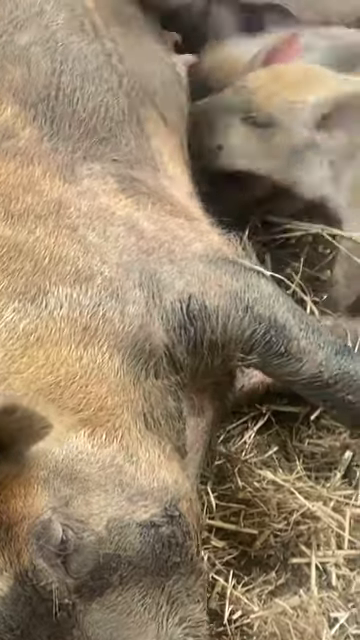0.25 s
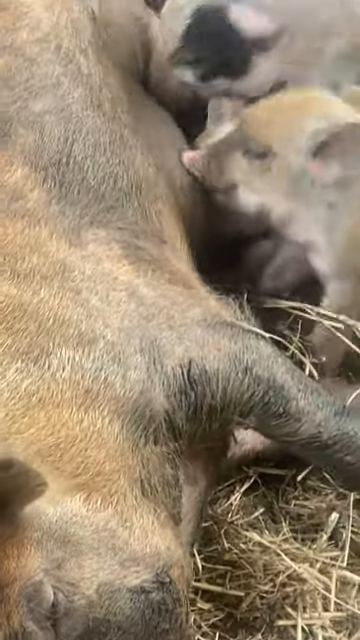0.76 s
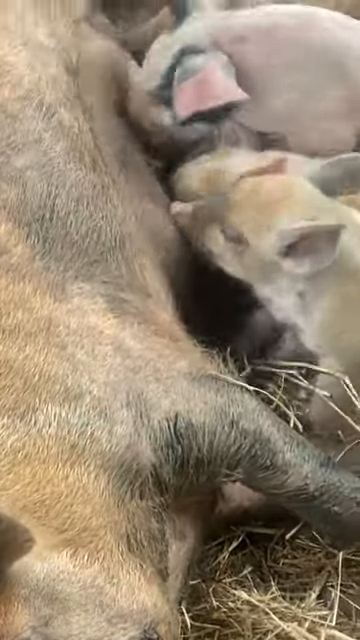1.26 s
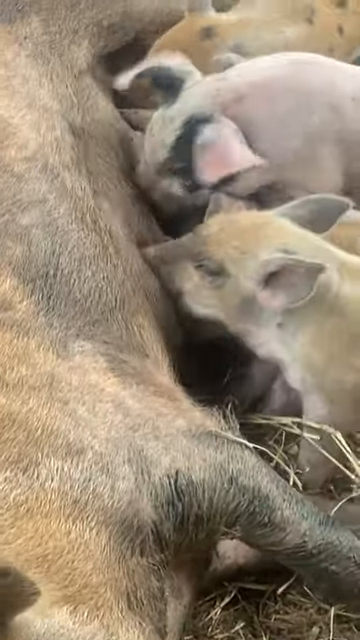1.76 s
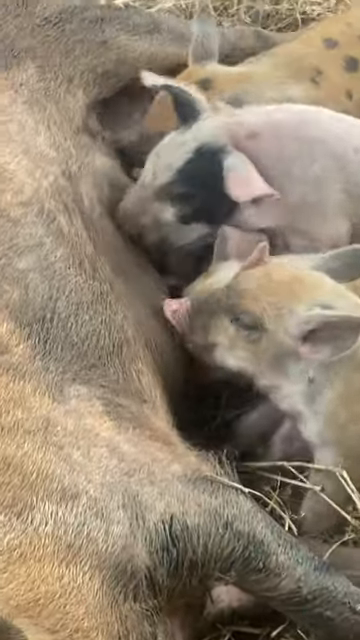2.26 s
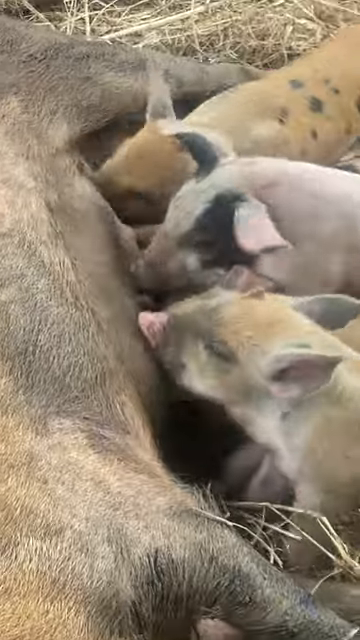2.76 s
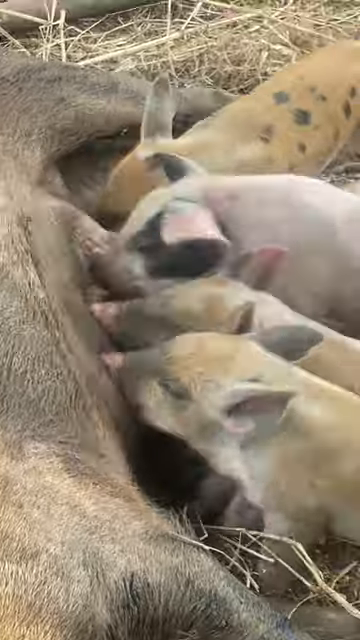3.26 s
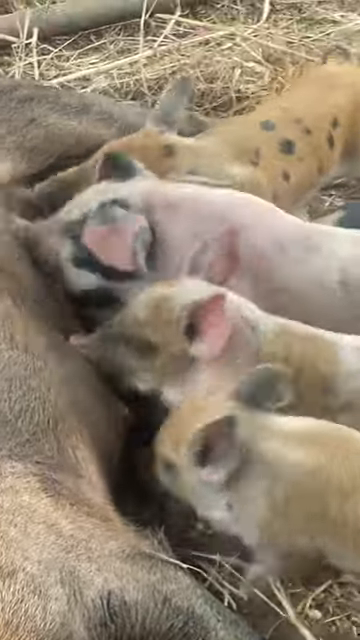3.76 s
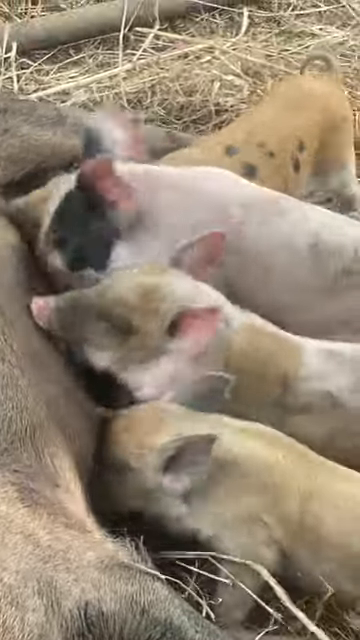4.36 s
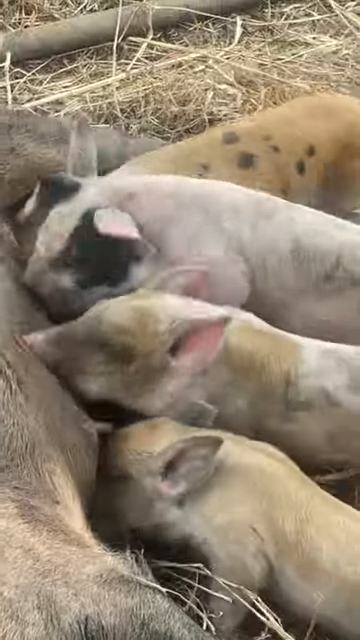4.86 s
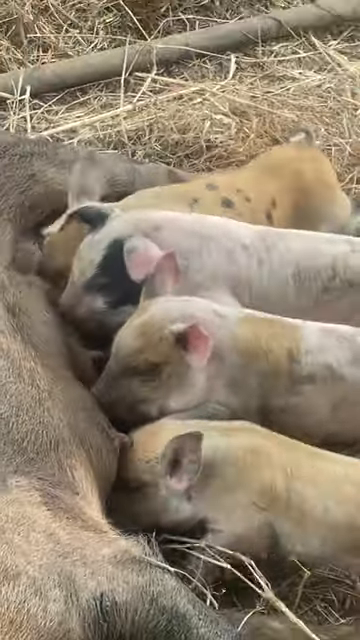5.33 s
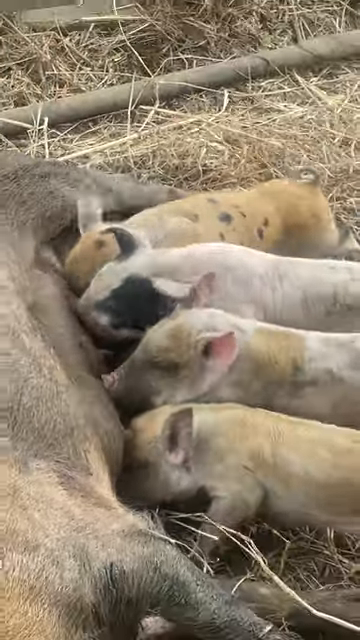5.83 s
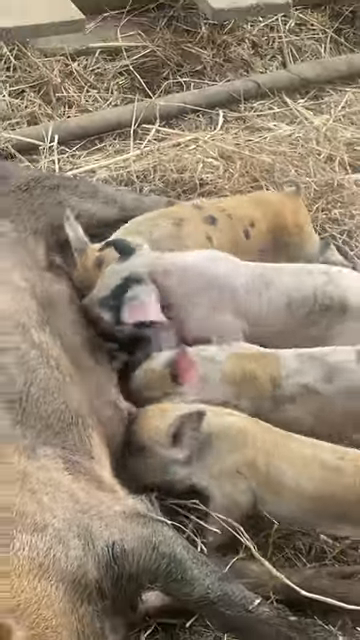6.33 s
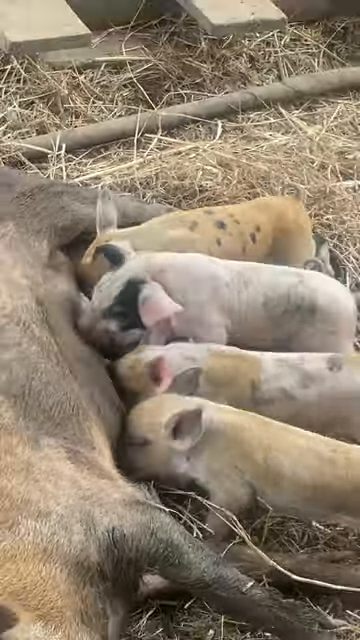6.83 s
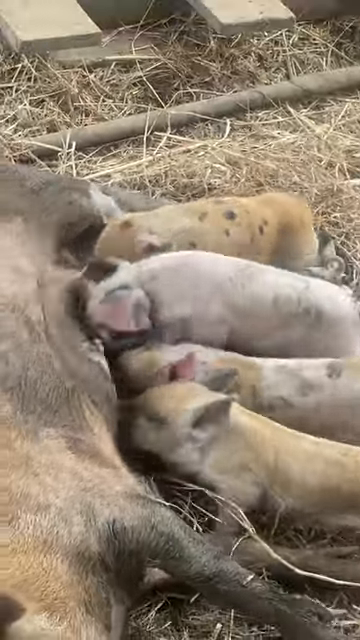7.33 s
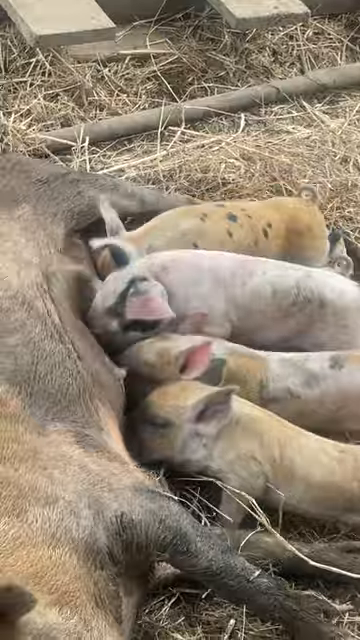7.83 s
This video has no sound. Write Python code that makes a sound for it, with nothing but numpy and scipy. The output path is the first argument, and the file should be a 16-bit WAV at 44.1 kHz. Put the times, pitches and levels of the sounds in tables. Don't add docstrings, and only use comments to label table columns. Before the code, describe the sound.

A sow gives short, low, rattling grunts about twice a second, close up, while piglets smack softly and straw rustles over faint insect hiss.

```python
import sys
import numpy as np
from scipy import signal
from scipy.fft import rfft, irfft, next_fast_len
from scipy.io import wavfile
from scipy.ndimage import uniform_filter1d

SR = 44100
rng = np.random.default_rng(int(sys.argv[2]) if len(sys.argv) > 2 else 0)


def persist_wave(psi):
    counts = np.round(np.clip(psi, -1, 1) * 32767).astype(np.int16)
    wavfile.write(sys.argv[1], SR, np.atleast_2d(counts).T)


def natural_amplitude(level_db):
    exponent = np.asarray(level_db, float) / 20
    return 10 ** exponent


N = 356769
T, M = np.arange(N) / SR, next_fast_len(N)
F = np.arange(M // 2 + 1) * SR / M + 1e-3

# folds_part_s, first_clap_s, end_s, first_period_ms, period_change_per_clap_ms
GRUNTS = [(.069, 0.089, 0.274, 27.57, -1.83), (.579, 0.6063, 0.757, 26.83, -0.2),
          (.981, 1.0102, 1.17, 27.22, -1.54), (1.16, 1.1891, 1.35, 29.11, 0.69),
          (1.372, 1.3782, 1.591, 28.53, -0.49), (1.737, 1.7678, 1.95, 30.23, -2.49),
          (2.219, 2.2435, 2.432, 28.4, -1.34), (2.729, 2.7475, 2.932, 27.92, -1.92),
          (3.229, 3.2546, 3.435, 27.79, -1.63), (3.635, 3.6835, 3.81, 27.3, -1.66),
          (4.137, 4.1641, 4.32, 27.83, -0.77), (4.26, 4.2693, 4.535, 29.18, -0.04),
          (4.527, 4.5566, 4.73, 28.28, 0.47), (4.749, 4.7749, 4.965, 30.1, -1.44),
          (5.077, 5.1227, 5.278, 26.85, -0.91), (5.442, 5.4804, 5.658, 27.44, -0.66),
          (5.877, 5.9248, 6.083, 27.64, -1.07), (6.315, 6.3357, 6.518, 27.59, -0.59),
          (6.613, 6.6556, 6.79, 26.62, -1.18), (6.968, 6.9928, 7.181, 27.13, -1.36),
          (7.416, 7.4579, 7.64, 25.06, -0.08), (7.825, 7.8504, 8.03, 26.87, -0.4)]
# chest_db, strongest_clap_db, its_place_claps, fall_db_per_clap_squared, snout_db
EFFORTS = [(-29, -19, 1.71, 1.9, -28), (-31, -20, 1.13, 5.5, -28.5), (-30.5, -22, 0.87, 4, -34),
           (-32.5, -25, 1.38, 8.5, -33.5), (-33, -18.5, 2.48, 1.3, -28.5), (-33, -20, 1.63, 4.5, -30),
           (-30, -19, 1.72, 3, -29), (-30.5, -17.5, 1.48, 3.5, -28), (-32, -20.5, 1.02, 3, -31.5),
           (-31.5, -21.5, 0.49, 3.5, -47), (-31.5, -23.5, 1.13, 2, -34), (-34, -40, 0.1, 0, -49),
           (-36, -28.5, 0.091, 1.5, -36), (-32.5, -20.5, 1.6, 1.5, -28.5), (-30, -18, 1.3, 3.5, -27.5),
           (-31.5, -20, 1.95, 2.5, -30.5), (-31.5, -18.5, 0.76, 4, -29), (-31.5, -17.5, 1.62, 2.5, -28),
           (-30, -19.5, 0.29, 3.5, -30.5), (-30.5, -18, 1.53, 3.5, -27.5), (-30.5, -17, 1.25, 1.5, -27.5),
           (-30, -16.5, 1.61, 3.7, -26.5)]
SNOUT_FALL = [2.3, 12, 5.6, 8.6, 1.65, 4.5, 10, 3.6, 6, 3.8, 5.2, .4, 6.2, 1.5, 1.8, 1.7, 1.9, 1.55, 3.4,
              4.3, 1.5, 5.8]
# start_s, length_s, level_db
MURMURS = [(4.528, .01, -30.5), (3.453, .02, -42), (5.04, 0.016, -44), (6.163, 0.102, -44.5),
           (6.576, 0.013, -42)]
# pitch_hz, ring_t60_s, level_db
BELLY_MODES = [(75.1, 0.17, 0)]
CHEST_MODES = [(145.8, 0.13, 2), (174, 0.093, 0.5), (217, 0.07, -3), (308.7, 0.12, -6.5)]
THROAT_MODES = [(442.1, 0.14, -8), (474.7, 0.086, -6), (568.5, 0.03, 2), (632.7, 0.051, -7.5),
                (703, 0.054, -10), (849, 0.067, -4.5), (786, 0.0099, 0), (906.5, 0.072, -9.5),
                (1320, 0.013, -2.5), (1051, 0.013, -16.5)]
SNOUT_MODES = [(1368, 0.02, -20.5), (1500, 0.088, -7), (1692, 0.026, -6), (2160, 0.02, -6),
               (2405, 0.021, -2), (2900, 0.034, -6), (3074, 0.085, -11.5), (3490, 0.01, -7.5),
               (3740, 0.023, -2), (4040, 0.008, 7), (4308, 0.023, 3), (4650, 0.016, -5.5),
               (5180, 0.0059, -3.5), (8330, 0.035, -17), (9950, 0.039, -17.5)]
# start_s, level_db, centre_hz,
# decay_t60_s
SMACKS = [(.228, -55, 9000, .03), (0.517, -56, 2190, 0.16), (.875, -61, 2500, 0.018),
          (1.14, -47, 4500, 0.011), (1.991, -54, 9300, 0.066), (2.136, -53, 3600, 0.034),
          (2.148, -52, 2930, 0.036), (2.906, -38.5, 3280, 0.028), (3.227, -46, 2810, 0.047),
          (3.404, -48, 2600, 0.23), (3.734, -41.5, 4330, 0.031), (3.605, -55, 2620, 0.12),
          (4.08, -54, 2900, 0.15), (5.848, -53.5, 2230, 0.21), (6.041, -42, 3580, 0.026),
          (6.048, -41, 3670, 0.085), (6.581, -48, 9800, 0.022), (6.582, -55, 2740, 0.036),
          (6.835, -44.5, 2400, 0.12), (7.008, -54, 9500, .04), (7.267, -57.5, 2550, 1),
          (7.642, -44, 5200, 0.012), (7.81, -54, 2480, 0.18), (8.005, -57, 2600, 0.023)]
# start_s, level_db, centre_hz, decay_t60_s
SWELLS = [(0.199, -56.5, 2700, .6), (.84, -62, 1020, 0.2), (2.08, -57.5, 340, 0.17),
          (3.459, -51, 347, 0.14), (5.055, -52.5, 3720, 0.17), (7.24, -53.5, 373, 0.39),
          (7.7, -53.5, 336, 0.14), (5.05, -50.5, 9500, 0.23), (1.734, -46, 870, 0.18),
          (2.53, -59.5, 2860, 0.22), (2.917, -52, 3600, 0.079), (3.02, -55, 493, 0.24),
          (3.039, -58, 1230, 0.36), (3.37, -55, 2090, 0.16), (3.80, -52, 9700, 0.092),
          (4.275, -37, 338, 0.4), (4.23, -43, 680, 0.85), (4.305, -47, 1810, 0.27),
          (4.401, -54, 3840, 0.11), (5.062, -61, 2700, .2), (6.165, -53.5, 1370, 0.38),
          (6.201, -54.5, 2420, 0.27), (6.751, -53, 7950, 0.1), (6.88, -58, 2900, 0.24),
          (7.40, -40.5, 860, 0.33), (7.815, -59, 870, 0.094)]
# start_s, length_s, first_pitch_hz, last_pitch_hz, level_db
SQUEAKS = [
    (1.595, .02, 3120, 3260, -65),
    (1.61, .022, 2820, 3100, -69),
    (1.63, .022, 3300, 3330, -64),
    (1.883, .045, 3950, 3300, -60),
    (1.925, .027, 2850, 2220, -70),
    (2.115, .02, 2720, 2660, -66),
    (2.985, .025, 2150, 2060, -67),
    (3.19, .03, 2130, 2300, -67),
]
# start_s, length_s, first_pitch_hz, last_pitch_hz, level_db
WHINE = [
    (5.3, .15, 2330, 2280, -72),
    (5.65, .19, 2240, 2180, -72),
]
# time_s, stir_db
STIR = [(0.0, -62), (0.95, -63), (1.15, -51), (1.3, -66), (1.36, -55.5), (1.55, -68), (2.6, -72),
        (2.97, -62.5), (3.58, -58.5), (3.87, -67.5), (4.2, -58.5), (4.45, -62.5), (5.0, -65.5),
        (5.08, -59.5), (5.9, -69.5), (6.06, -62), (7.46, -60), (8.09, -65)]
# centre_hz, width_hz
STRAW_BANDS = [(450, 590), (2500, 6760), (9800, 4100)]
STRAW_GRAINS_HZ = [900, 3000, 5000]
PIGLET_STIR_DB = [-3, -0.5, -3.7]
FLANK_STIR_DB = [-26, -33, -64.5]
# frequency_hz, density_db_per_hz
FIELD = [(40, -6), (150, 2.5), (500, -20.5), (1100, -19), (1900, -27.5), (3000, -25.5), (4000, -20),
         (4900, -3.5), (5800, -10), (6500, -2.5), (7400, -13.5), (10000, -19), (12000, -33), (15500, -36)]
# frequency_hz, left_lead_rad
PORT_PHASE = [(0, 0), (430, -0.2), (950, 0.3), (1210, -0.0), (1890, 0.1), (2580, 1.2), (3360, 0.4),
              (3960, 0.4), (4650, 1.6), (5250, 6.2), (5770, 6.8), (7490, 7.7), (10900, 8.6), (11800, 9.4)]
# frequency_hz, left_minus_right_db
PORT_DB = [(100, 0), (300, .8), (520, -2), (800, 4.5), (1000, 5.5), (1300, 2.5), (1800, 0), (16000, 0)]
# frequency_hz, share_0_to_1
PORT_APART = [(200, 0.044), (350, 0.24), (800, 0.51), (2000, 0), (5000, 0.24), (7500, 0.25), (11000, 0.23),
              (12000, 0.042)]


def sow():
    s, throat_db, snout_db = claps()
    chest = body(s, CHEST_MODES, 0, sooner_s=0.014)
    belly = natural_amplitude(-4) * body(s, BELLY_MODES, lag_s=0.012, sooner_s=0)
    fade = np.exp(-np.log(1000) / (.1 * SR))
    puff = signal.lfilter([1], [1, -fade], clicks(s, throat_db)) * rng.standard_normal(N) * natural_amplitude(-31)
    rasp = signal.lfilter([1], [1, -fade], clicks(s, snout_db)) * rng.standard_normal(N) * natural_amplitude(-40)
    flutter = natural_amplitude(effort(0) - 37 + 2.2 * walk(90)) * rng.standard_normal(N)
    throat_drive = uneven(s + .0004, throat_db, THROAT_MODES) + natural_amplitude(3.0) * puff + flutter
    throat = push(ring(throat_drive, THROAT_MODES, 1), .8)
    snout_drive = uneven(s, snout_db, SNOUT_MODES) + rasp + natural_amplitude(-13) * puff
    snout = ring(snout_drive, SNOUT_MODES)
    voice = chest + belly + natural_amplitude(-7.5) * throat + natural_amplitude(-4.5) * snout
    return voice - 0.85 * band(voice, 356.3, 90)


def claps():
    lead_gap_s, lead_db, lead_step_db, lead_snout_db = .0205, -18, 7.5, -21
    snout_earlier_claps, shortest_period_ms = 0.47, 22
    rows, k = [], np.arange(12)
    for s, length, db in MURMURS:
        rows += [(at, db, db + lead_snout_db) for at in np.arange(s, s + length, lead_gap_s)]
    for grunt, strength, snout_fall in zip(GRUNTS, EFFORTS, SNOUT_FALL):
        part, start, end, ms, drift = grunt
        _, db, at, fall, snout_db = strength
        opening = part + lead_gap_s * k
        soft = db + lead_db + lead_step_db * k
        rows += list(np.c_[opening, soft, soft + lead_snout_db][opening < start - .008])
        periods = np.maximum(ms + drift * k, shortest_period_ms)
        s = start + np.r_[0, np.cumsum(periods)[:-1]] / 1000
        throat = db - fall * (k - at) ** 2
        snout = snout_db - snout_fall * (k - at + snout_earlier_claps) ** 2
        rows += list(np.c_[s, throat, snout][s < end])
    return np.transpose(rows)


def effort(lag_s, sooner_s=0):
    early_s, attack_s, release_s = 0.0024, 0.022, .07
    start_db, tilt_db, end_db, rest_db = -11, 0.9, -17.5, -56.5
    calls = [(part, clap, end, row[0]) for (part, clap, end, *_), row in zip(GRUNTS, EFFORTS)]
    calls += [(s, s, s + length + 0.023, db + 3.5) for s, length, db in MURMURS]
    out = np.full(N, rest_db)
    for part, clap, end, db in calls:
        full = clap + attack_s
        stop = end - sooner_s
        times = [part - early_s, full, max(stop - release_s, full), max(stop, full + 0.013)]
        shape = db + np.array([start_db, -tilt_db, tilt_db, end_db])
        out = np.maximum(out, np.interp(T - lag_s, times, shape, -99, -99))
    return out


def body(s, modes, lag_s, sooner_s):
    tone = ring(push(clicks(s, 0 * s), 2.97), modes)
    tone = tone / np.sqrt(uniform_filter1d(tone ** 2, size=1800) + 0.27)
    rough = natural_amplitude(-13) * unit(ring(rng.standard_normal(N), modes))
    return natural_amplitude(effort(lag_s, sooner_s)) * (tone + rough)


def uneven(s, db, modes):
    scatter_db = 1.3
    chance = rng.standard_normal((len(s), len(modes))).T
    return np.array([clicks(s, db + scatter_db * c) for c in chance])


def smacks():
    size = 8000
    out, t = np.zeros(N), T[:size]
    rows = [row + (0.003,) for row in SMACKS]
    rows += [row + (0.087 * row[-1],) for row in SWELLS]
    for (s, db, hz, t60, rise), noise in zip(rows, rng.standard_normal((len(rows), size))):
        edges = [hz / 1.38, min(hz * 1.234, .45 * SR)]
        sos = signal.butter(3, edges, "band", fs=SR, output="sos")
        shape = np.minimum(t / rise, 1) * 1000 ** (-np.maximum(t - rise, 0) / t60)
        burst = natural_amplitude(db) * unit(signal.sosfilt(sos, noise)) * shape
        i = int(s * SR)
        out[i:i + size] += burst[:N - i]
    return out


def squeaks():
    tremble = walk(250)
    short_calls = sum(glide(row, 0.043 * tremble, 0.12) * natural_amplitude(1.97 * walk(120) + 2.0) for row in SQUEAKS)
    far = sum(glide(row, 0.047 * tremble, 0.084) for row in WHINE)
    return short_calls + far


def glide(row, wobble, edge_share):
    s, length, first_hz, last_hz, db = row
    part = np.clip((T - s) / length, 0, 1)
    gate = np.minimum(np.minimum(part, 1 - part) / edge_share, 1)
    hz = (first_hz + part * (last_hz - first_hz)) * (1 + wobble)
    return np.sqrt(2) * gate * natural_amplitude(db) * np.sin(2 * np.pi * np.cumsum(hz) / SR)


def straw():
    scatter_db, top_db = 1.8, -56
    out, stir, heave = 0, table(STIR, T)[0], effort(0)
    ranges = zip(PIGLET_STIR_DB, FLANK_STIR_DB, STRAW_BANDS, STRAW_GRAINS_HZ)
    for stir_db, heave_db, (hz, width), rate in ranges:
        sizes = rng.standard_normal(N) * natural_amplitude(scatter_db * rng.exponential(size=N))
        grains = (rng.random(N) < rate / SR) * sizes
        gain = np.minimum(natural_amplitude(stir + stir_db) + natural_amplitude(heave + heave_db), natural_amplitude(top_db))
        out = out + gain * natural_amplitude(2.9 * walk(7.6)) * unit(band(grains, hz, width))
    return out


def field():
    colour = rfft(rng.standard_normal(M)) * natural_amplitude(spectrum(FIELD))
    out = 0
    for hz in 40 * 2 ** np.arange(0, 9, .5):
        flicker = natural_amplitude((1.5 + hz / 5000) * walk(7))
        out = out + flicker * irfft(colour * np.exp(-(np.log2(F / hz) * 0.97) ** 2), M)[:N]
    return natural_amplitude(-54.5) * unit(out)


def ports(x, apart):
    half = natural_amplitude(spectrum(PORT_DB) / 2) * np.exp(.5j * table(PORT_PHASE, F)[0])
    smear = np.exp(2j * np.pi * rng.random(len(F) // 40 + 1)).repeat(40)[:len(F)]
    side = apart * np.clip(spectrum(PORT_APART), 0, 1) * smear
    return irfft(rfft(x, M) * np.array([(1 + side) * half, (1 - side) / half]), M)[:, :N]


def table(rows, at):
    x, *cols = np.transpose(rows)
    return [np.interp(at, x, c) for c in cols]


def spectrum(rows):
    return table([(np.log(hz), v) for hz, v in rows], np.log(F))[0]


def unit(x):
    return x / np.sqrt(np.mean(x ** 2))


def clicks(times, db):
    return np.bincount(np.clip((times * SR).astype(int), 0, N - 1), natural_amplitude(db), N)


def ring(x, modes, flip=-1):
    out = 0
    for k, (hz, t60, db) in enumerate(modes):
        r, w = 1000 ** (-1 / (t60 * SR)), 2 * np.pi * hz / SR
        gain = flip ** k * natural_amplitude(db) * r * np.sin(w)
        drive = x[k] if x.ndim > 1 else x
        out = out + signal.lfilter([0, gain], [1, -2 * r * np.cos(w), r * r], drive)
    return out


def push(x, ms):
    bump = np.hanning(int(ms * SR / 1000) + 3)
    return np.convolve(x, bump / bump.sum())[:N]


def band(x, hz, width):
    return irfft(rfft(x, M) * np.exp(-(np.log(F / hz) * hz / width * 2) ** 2), M)[:N]


def walk(rate):
    k = int(SR / rate)
    held = np.repeat(rng.standard_normal(N // k + 1), k)
    return uniform_filter1d(uniform_filter1d(held, k), k)[:N]


def scene():
    near = ports(sow() + smacks() + squeaks(), 0.1)
    around = ports(straw() + field(), 0.98)
    return near + around


def low_pass(x):
    return signal.sosfilt(signal.butter(12, 12260, fs=SR, output="sos"), x)


def record(dry):
    dry = signal.sosfilt(signal.butter(4, 61, "high", fs=SR, output="sos"), dry)
    mix = np.tanh(3.5 * dry) / 3.5
    return low_pass(mix)


dry = scene()
out = record(dry)
persist_wave(out)
```